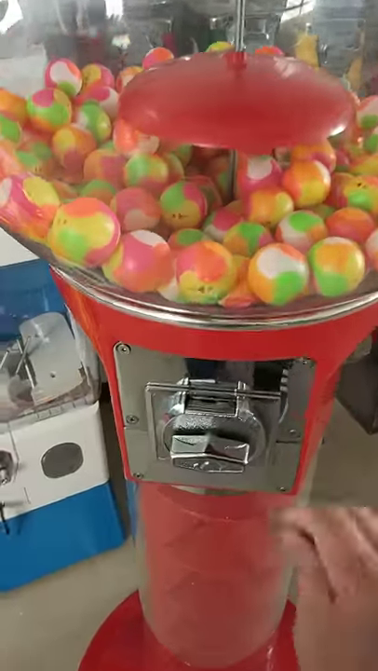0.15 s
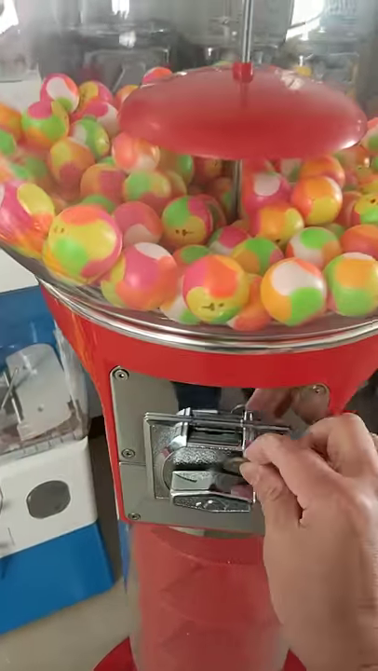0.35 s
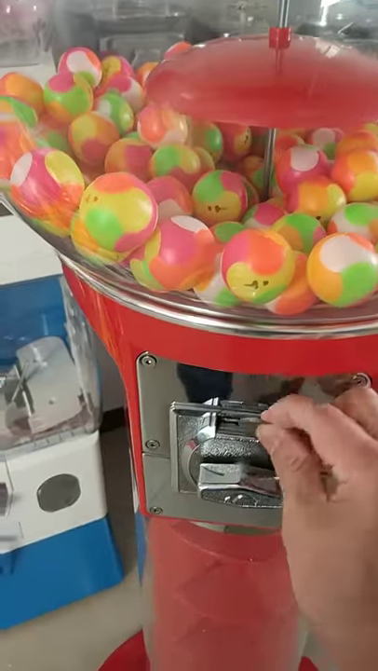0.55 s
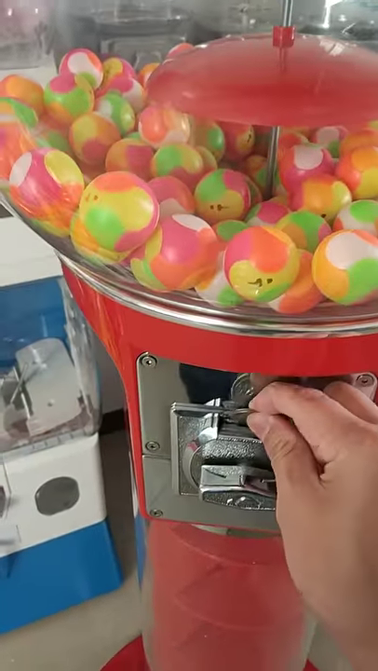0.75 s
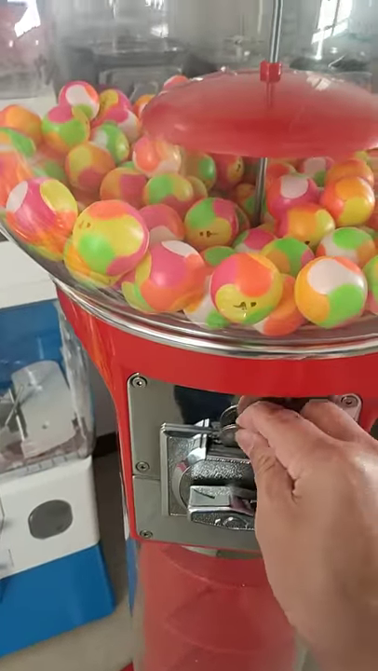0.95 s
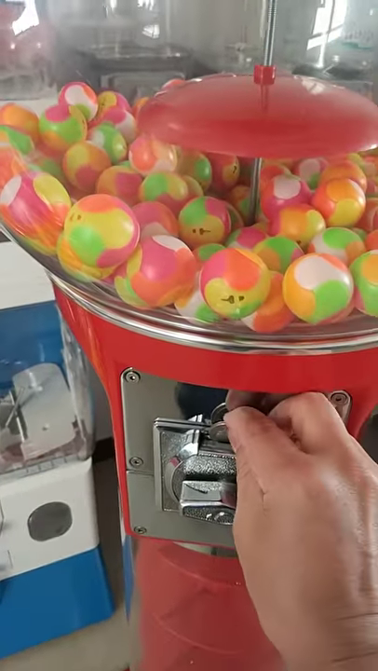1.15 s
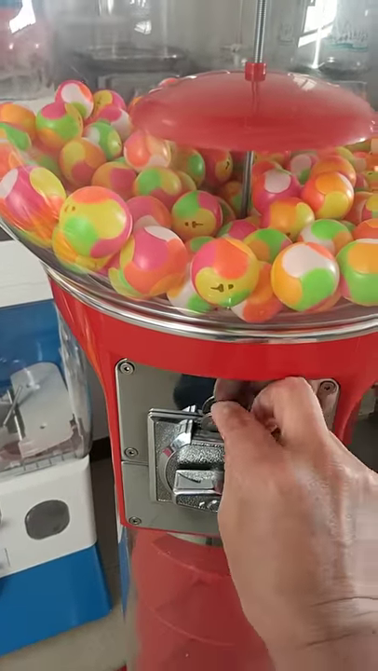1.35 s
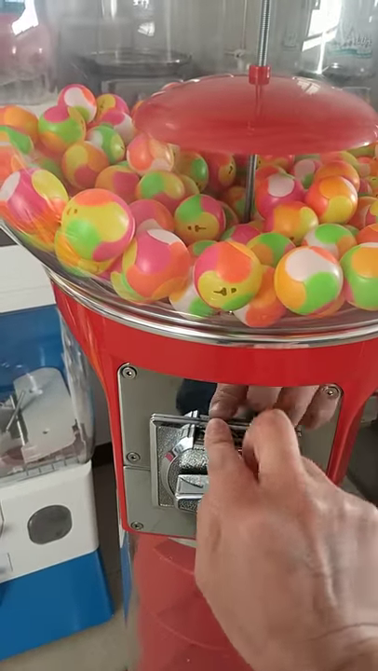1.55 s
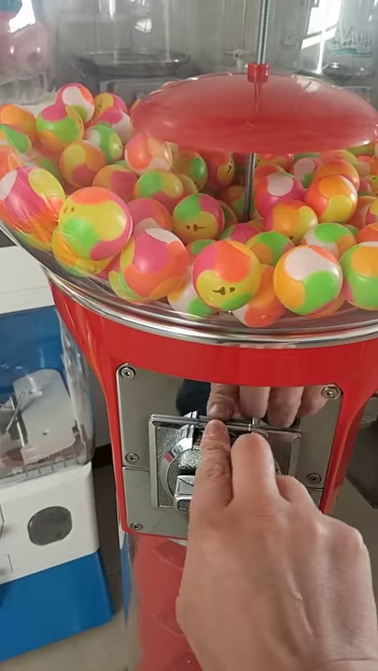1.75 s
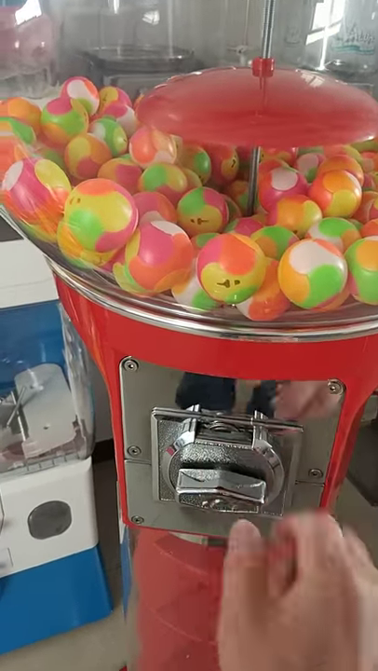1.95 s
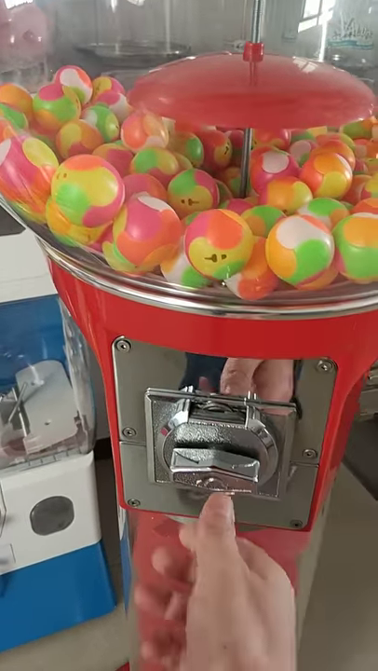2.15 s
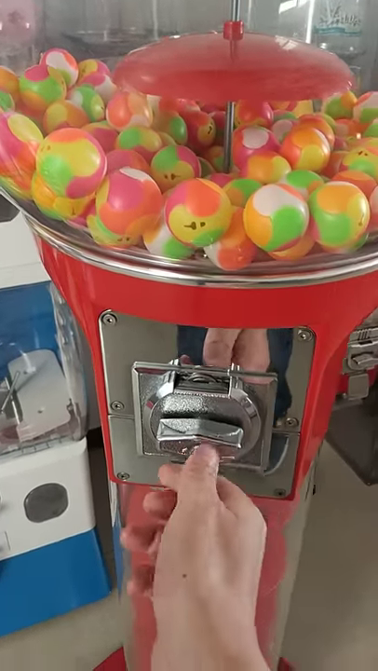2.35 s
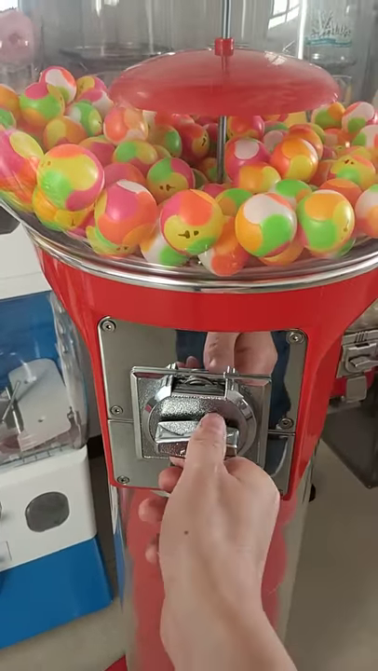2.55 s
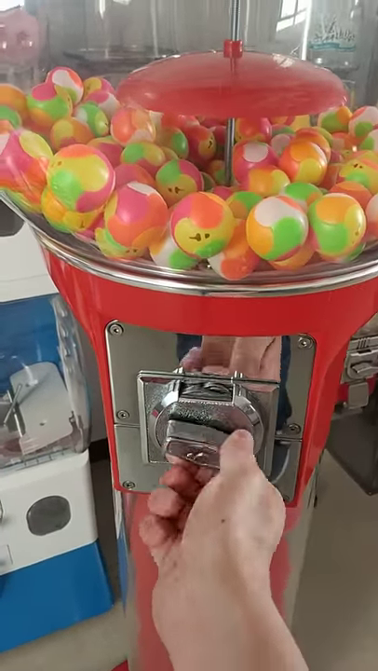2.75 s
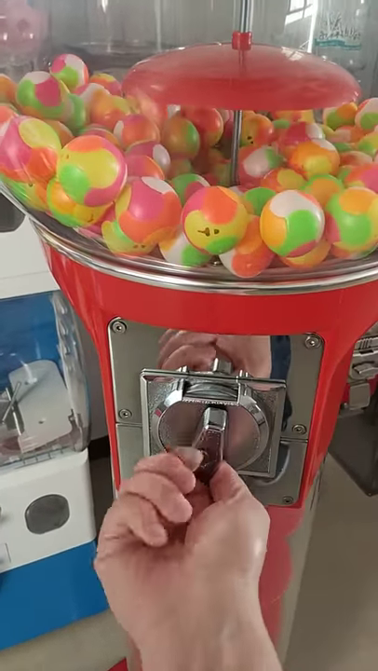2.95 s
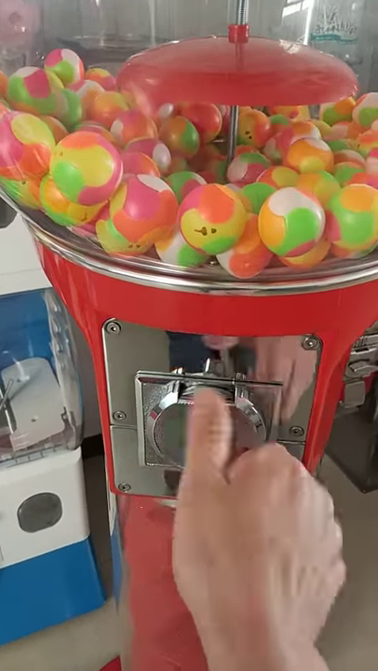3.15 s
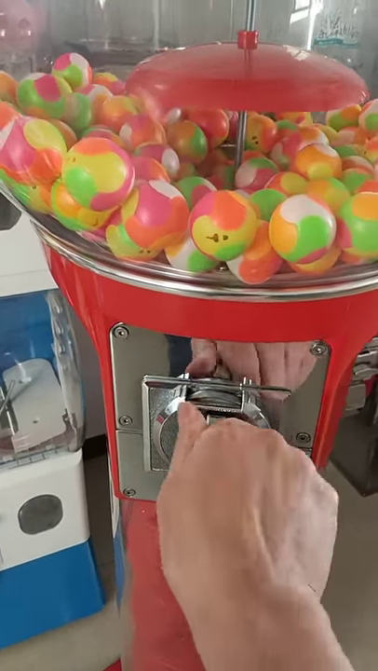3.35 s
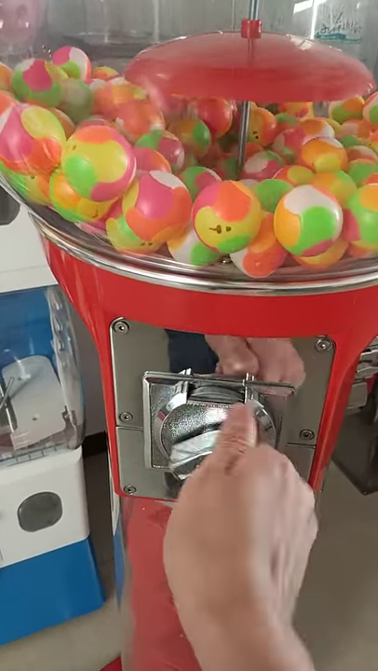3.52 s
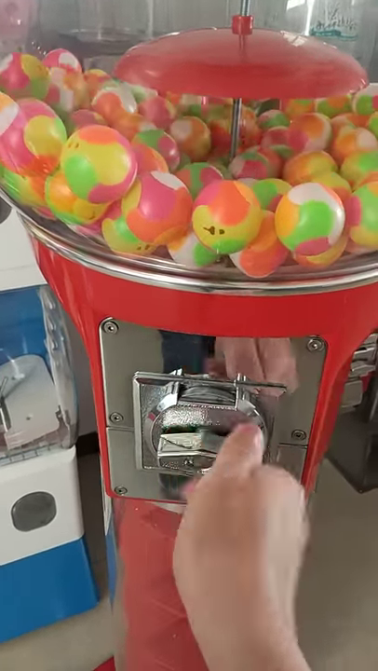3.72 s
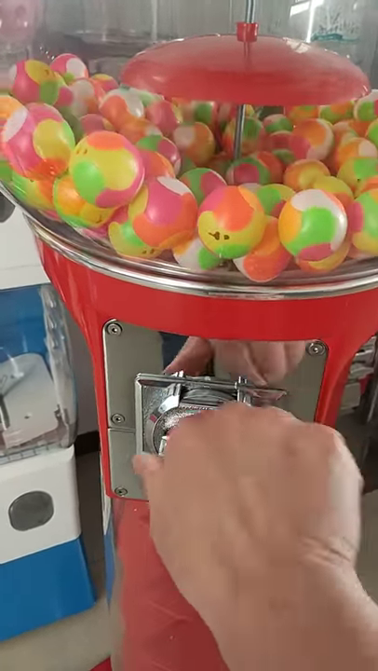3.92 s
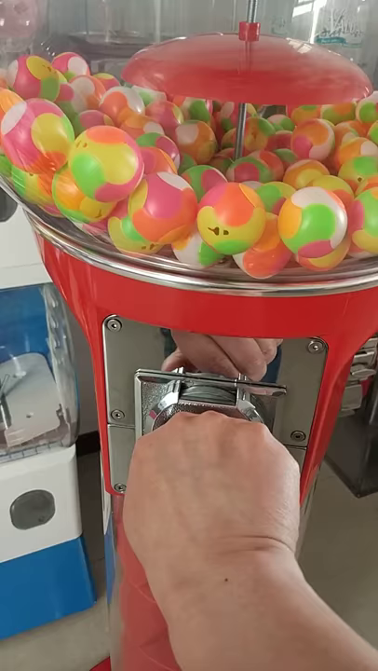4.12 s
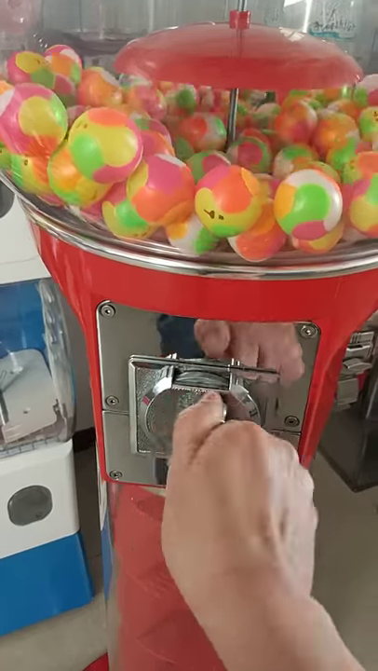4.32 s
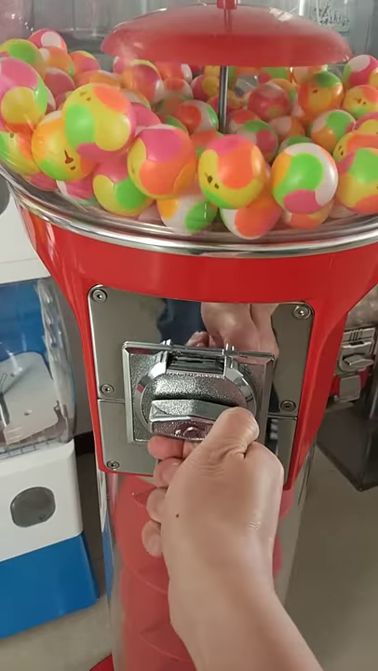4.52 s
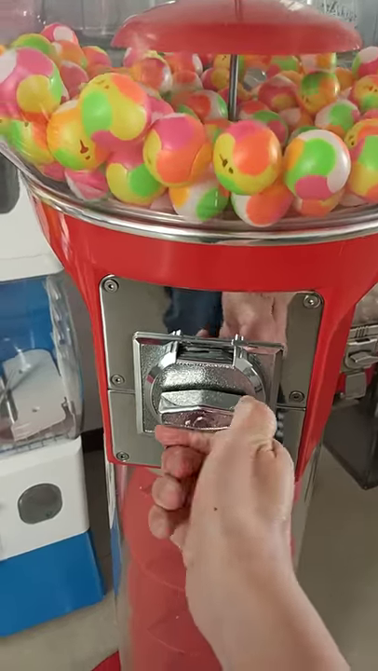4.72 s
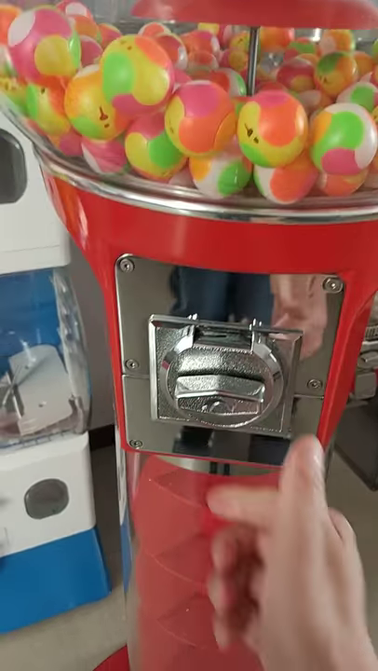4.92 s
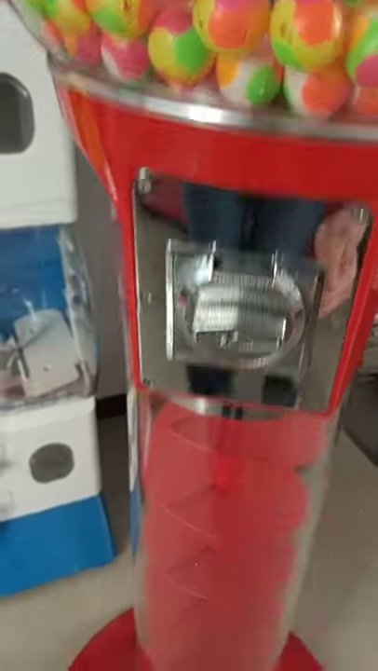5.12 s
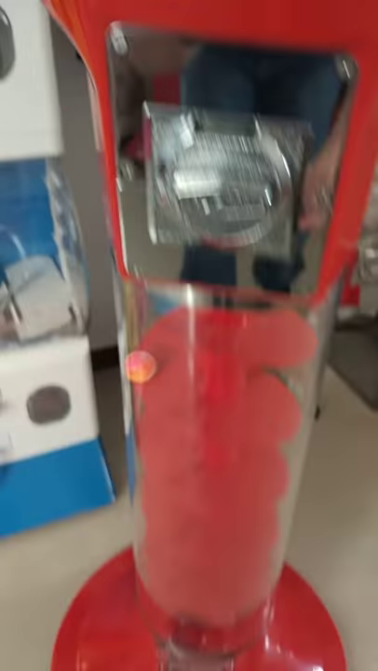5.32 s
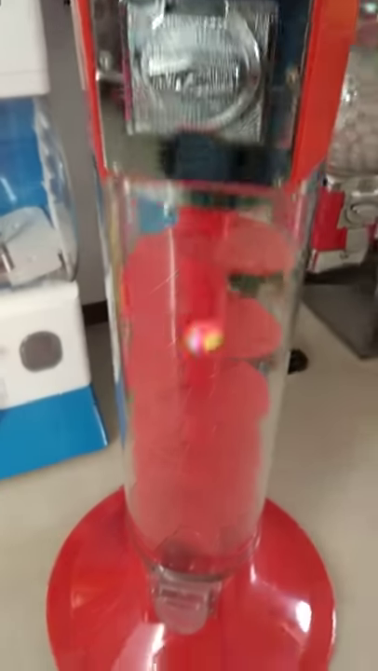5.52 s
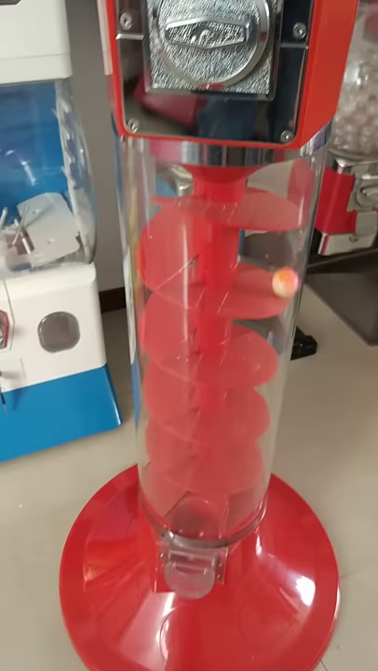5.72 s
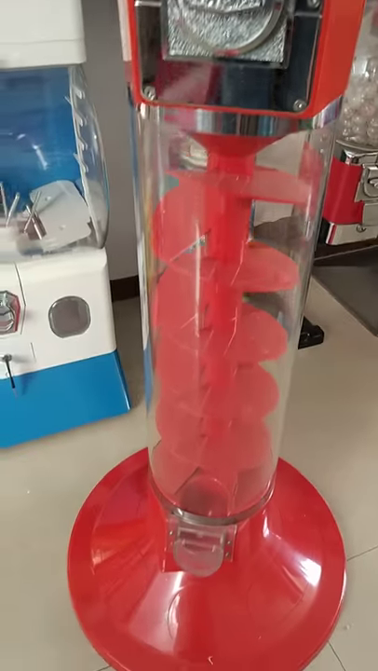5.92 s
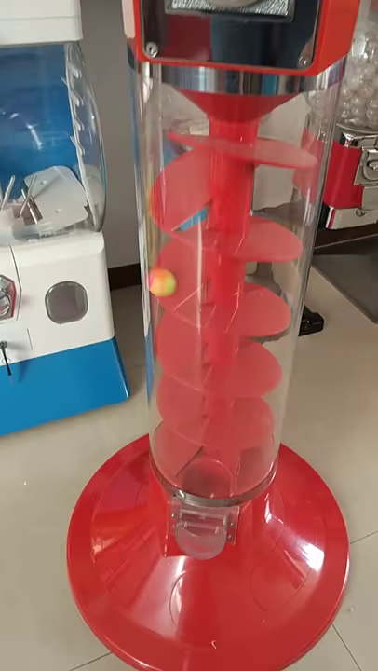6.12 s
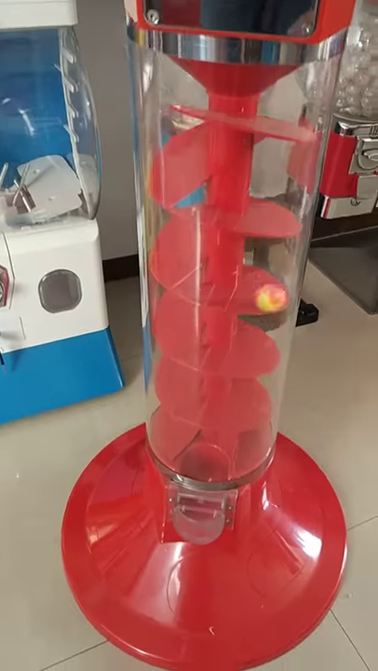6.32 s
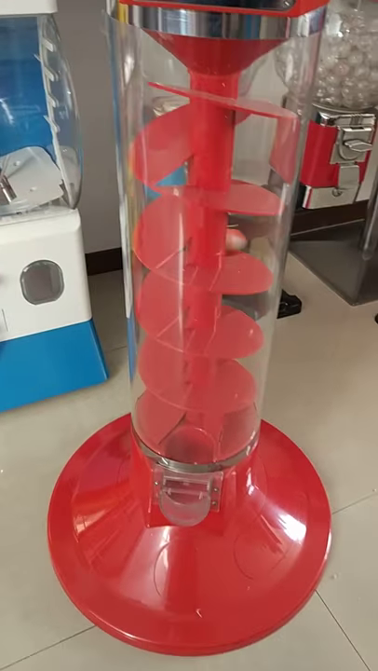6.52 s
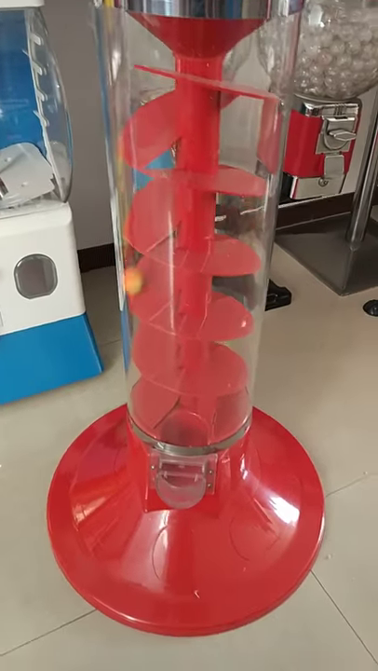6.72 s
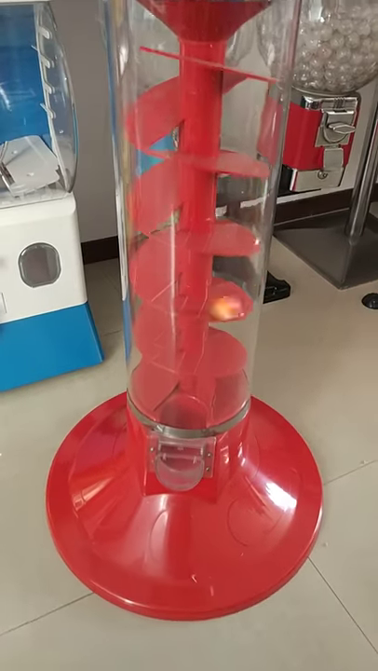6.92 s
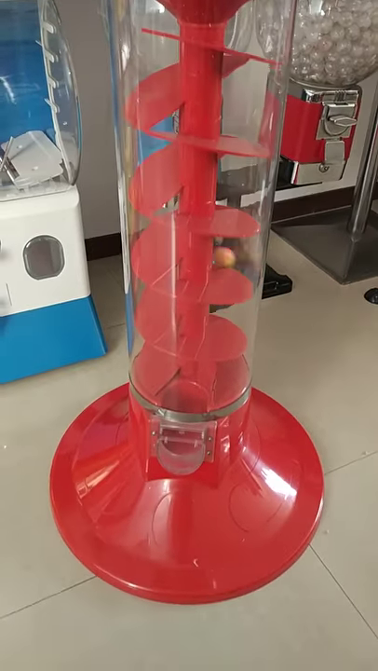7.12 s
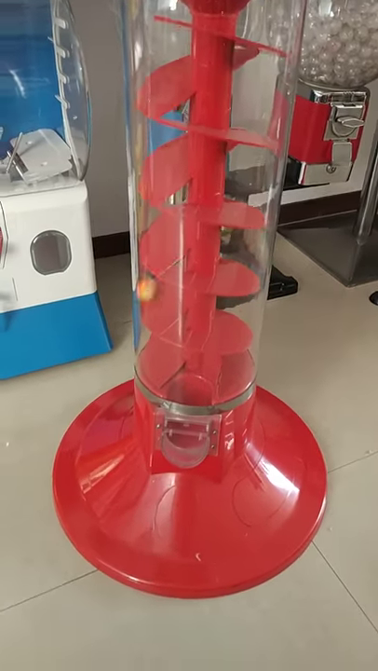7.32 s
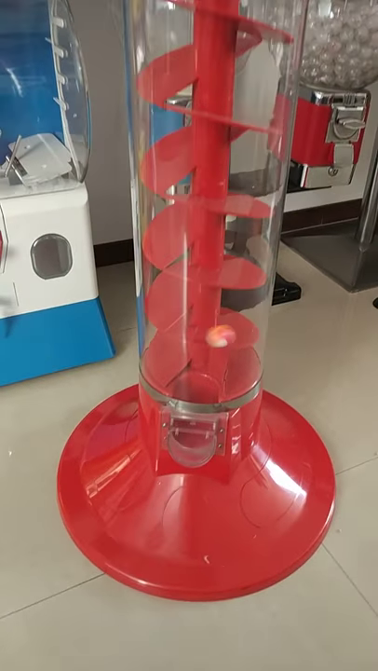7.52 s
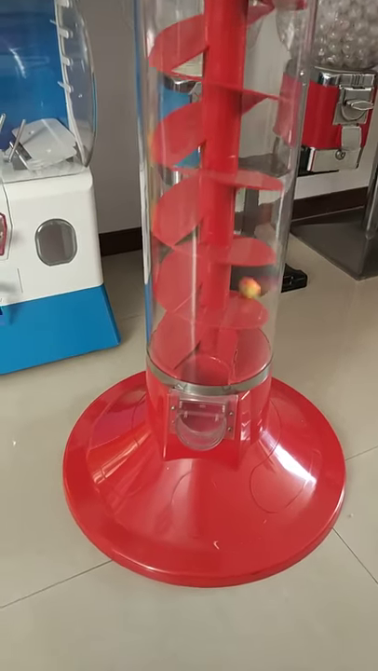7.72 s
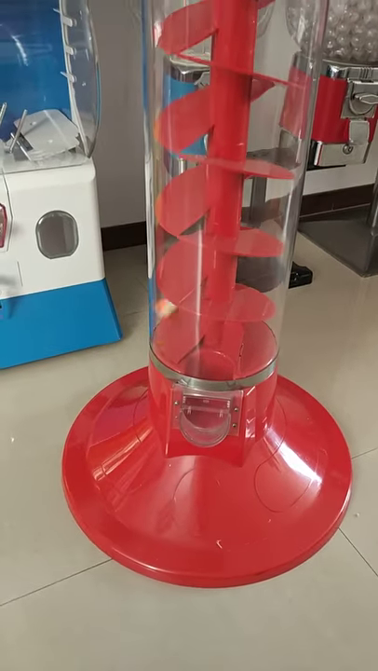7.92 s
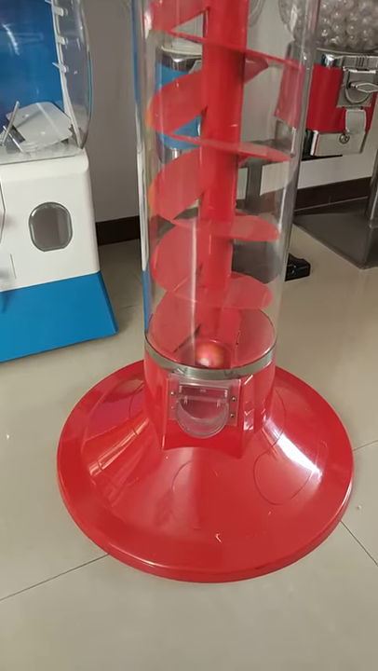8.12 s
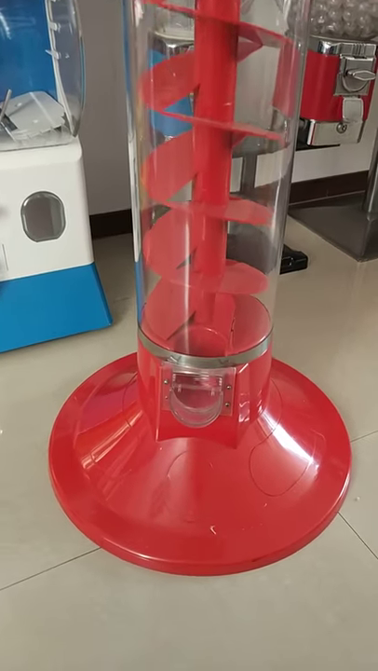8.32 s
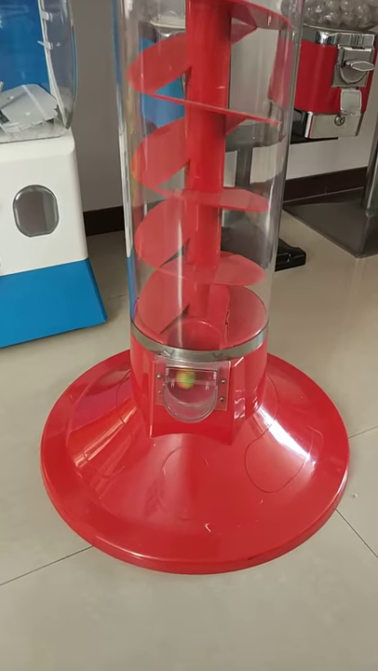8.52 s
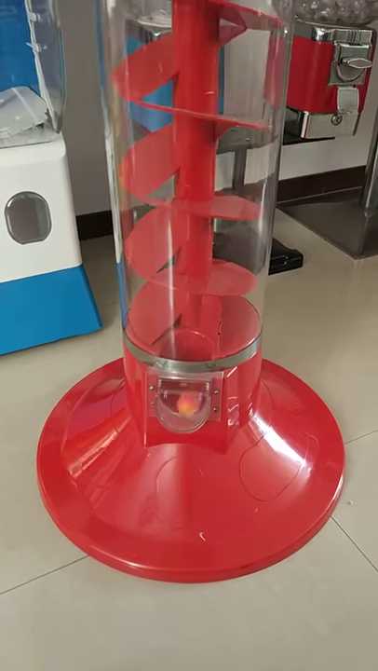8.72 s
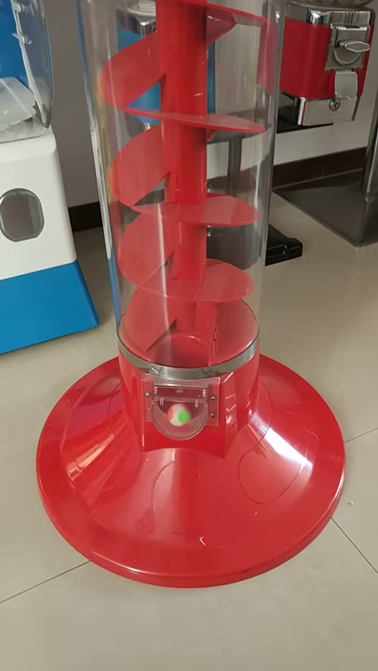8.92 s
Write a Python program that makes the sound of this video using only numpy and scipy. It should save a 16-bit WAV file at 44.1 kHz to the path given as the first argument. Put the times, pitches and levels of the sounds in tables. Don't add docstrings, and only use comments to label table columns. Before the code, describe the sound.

Close stereo phone pickup in a small hard room. A coin ticks and scrapes in a metal slot, then drops with a brief bright ring. A metal knob grinds round with sharp pawl clicks while rubber balls thud and clack inside. One ball drops with a hollow boom, rolls down a plastic spiral with faint rhythmic hisses and taps, then slaps the outlet flap twice.

```python
import sys
import numpy as np
from scipy import signal
from scipy.io import wavfile
from scipy.ndimage import uniform_filter1d, minimum_filter1d

SR = 44100
rng = np.random.default_rng(int(sys.argv[2]) if len(sys.argv) > 2 else 0)


def wav_out(sig):
    wavfile.write(sys.argv[1], SR, np.round(np.clip(np.atleast_2d(sig).T, -1, 1) * 32767).astype(np.int16))


def level_to_linear(level):
    exponent = np.asarray(level, float) / 20
    return 10 ** exponent


N = 395136

# frequency in Hz, level in dB per Hz.
AIR = [(24, -69), (130, -4), (209, 4), (444, 2), (556, -1.5), (896, 2), (1180, -8), (16000, -16)]
AIR_DB = -58
# time in seconds, level in dB.
AIR_SWELL = [
    [(0.0, -58), (0.044, -63), (0.32, -57)],
    [(8.81, -48), (8.846, -57), (8.96, -46)],
]
# frequency in Hz, t60 in seconds.
ROOM = [(200, 0.16), (530, 0.34), (1390, 0.29), (3680, 0.28), (9700, 0.29)]
# frequency in Hz, level in dB, t60 in seconds.
FAR_RING = [(2740, -63, 2.5)]
FAR_STOP_S = .12

# lower edge in Hz, upper edge in Hz.
BANDS_HZ = [(4000, 8000), (175, 1200), (1200, 4000), (8000, 15700)]
LIKENESS = [1, 0.41, 0.61, 0.85]
LAG = 8
ALIKE_RUB = [0.065, 0.58, 0.044, .05]
# frequency in Hz, left over right in dB.
PORTS = [(60, -3), (130, -9), (290, -0.5), (640, -1.5), (1410, -0.5), (3100, 3), (6820, -0.5),
         (15000, 13.5)]
# frequency in Hz, share from 0 to 1.
EMPTY = [(2300, .015), (4000, .27), (6000, .45), (10000, .12), (12500, .27), (14000, .55), (15500, .7),
         (15900, .99)]
MASK_DB, MASK_FROM_HZ, MASK_TO_HZ = -16, 2600, 8500

# frequency in Hz, width in Hz, level in dB over the broad response.
COIN_BODY = [(352, 150, 7.5), (562, 59, 7), (1056, 72, 6.5), (2570, 51, -24), (3250, 150, -44),
             (5240, 150, 14.5), (6200, 450, 3), (9500, 560, 10), (11000, 1100, 11), (11500, 29, 8),
             (14600, 110, -5)]
# frequency in Hz, width in Hz, level in dB.
KNOB_BODY = [(328, 73, 0.71), (450, 40, 9.5), (572, 57, 9), (792, 110, 0.5), (1590, 140, 3), (2100, 42, -3),
             (2800, 1400, 0.89), (3750, 120, 2.7), (6450, 4500, -0.5), (9500, 2300, 11.5),
             (10660, 1600, 11), (12300, 650, 8)]
# frequency in Hz, width in Hz, level in dB.
COLUMN_BODY = [(227.1, 7.4, 27.1), (378, 6.9, 4.7), (592, 17, 16.3), (780, 180, 3.2), (1185, 470, 9.8),
               (2450, 640, 11), (3256, 1020, 12.3), (9330, 2300, 13.6)]
HARD_BODY = COLUMN_BODY[2:]
# frequency in Hz, width in Hz, level in dB.
SLOT = [(3120, 570, 17), (3870, 970, 27), (6150, 460, 27)]
# frequency in Hz, width in Hz, level in dB.
FLAP_BODY = [(830, 80, 17.5), (1220, 150, 15.5), (2260, 500, 13), (3470, 300, 1), (4250, 84, -25),
             (8800, 2500, 9), (12500, 1500, 15)]

# treble, bass and middle over the force in dB; how each follows hardness
# in dB per dB; chatter t60 in seconds. TICK and NUDGE are the coin's.
TICK = (0, -16.5, -14.5), (0, -1.19, -0.78), 0.017
NUDGE = (-9, -10.5, 0), (0.82, -0.09, 0), 0.18
PUSH = (-16.5, 0, -15), (0.46, 0, 0.45), 0.047
CLICK = (0, -14, -10), (0, -0.061, -0.44), 0.015
CLUNK = (-0.8, -15.5, 0), (0, -0.9, 0), 0.024
THUD = (0, 0, -7), (0.69, 0, 0.3), 0.061
CLACK = (0, -45, 0), (0.82, .1, 0), 0.037
HOLLOW = (-3.5, -3.5, -5), (0.36, 0, 0.59), 0.05
RAP = (-0.27, -10, 0), (1, 0.79, 0), 0.04
SEAM = (0, -6.5, -4), (0, -1.3, -0.41), 0.063
SLAP = (0, -26, -10.5), (0, -2.06, -0.29), 0.048
# treble, bass, middle and fizz over the pressure in dB;
# how each follows speed in dB per dB.
CRANK_COLOUR = (0.84, -3.5, 0, 1), (0.36, -0.27, 0.063, 0.75)
SLIDE_COLOUR = (-1.8, -16, 0, -4.5), (1, 2, 0.014, 1.68)
ROLL_COLOUR = (-3.5, -5.5, 0, -7), (0.7, 0.05, 0.092, 1)
KNOCK_MOST_DB = 6
RING_MOST_DB, RING_MOST_S = 3, .06

# start in seconds, force in dB, hardness in dB, pitch in Hz.
COIN_TICKS = [(0.3333, -19, 3.5, 8900), (0.3704, -17, 8, 8800), (0.3761, -16, 1, 3600),
              (0.403, -11.5, -11, 545), (0.4075, -17, -14, 1430), (0.4597, -29, 8, 4320),
              (0.4742, -32, 8, 3340), (0.4861, -20.5, 16, 4570), (0.5111, -18.5, 19, 4140),
              (0.5065, -27, 18, 3800), (0.549, -22, 15, 6370), (0.543, -39, 10, 6200),
              (0.553, -38, 8, 3980), (0.118, -46, -11, 1900), (0.5216, -12.5, 33, 6200),
              (0.816, -15.5, 7.5, 6340), (0.9583, -37.5, -16.5, 2100), (1.0452, -62, -25, 8000),
              (1.5351, -35, -12, 6900), (1.5885, -12.5, -2, 5600), (1.5897, -15, -6.5, 12050),
              (1.594, -22, 4, 9000), (1.8592, -34.5, -10, 4200), (1.889, -37, -4, 3470)]
# start in seconds, force in dB, hardness in dB, pitch in Hz.
COIN_NUDGES = [
    (0.4267, -31, 20, 3600),
    (0.634, -42.5, -16, 2640),
    (0.7361, -40, 14.5, 2400),
    (0.832, -35, 7, 2570),
]
# time in seconds, pressure in dB, speed as brightness in dB.
SLIDE = [
    [(0.44, -47, -6), (0.475, -39, -8), (0.5, -37, -6), (0.52, -35, -2)],
    [(0.515, -33, 2), (0.535, -32, 1), (0.558, -31, 1), (0.57, -42, -3), (0.6, -56, -8)],
    [(1.563, -40, -40), (1.585, -40, 10.5), (1.592, -39, 15)],
]
CATCHES_PER_S, CATCH_SHARE = 600, .55
# frequency in Hz, level in dB, t60 in seconds.
COIN_RING = [(5430, -35, 0.24), (15000, -44, 0.17), (6500, -55, 0.13), (9000, -35, 0.21),
             (10030, -34, 0.19), (11440, -42, 0.4), (12050, -42, 0.1)]
COIN_DROP_S = 1.59
# time in seconds, level in dB.
SING = [(3.64, -62), (3.74, -55), (3.85, -47), (3.99, -71), (4.04, -64), (4.14, -48), (4.28, -76)]
SING_HZ, SING_WIDTH = 15020, 70
SLIDE_DB, COIN_DRY = 1.5, .45
TICK_RING_S = .009

# start in seconds, force in dB, hardness in dB.
THUMB = [(2.3482, -37.5, 8), (2.4057, -40.5, -10), (2.5507, -37, 11.5), (2.7285, -31.5, -44),
         (2.808, -35, 13), (2.841, -37, 7), (3.3661, -26, 12.5), (3.4917, -36.5, 6), (3.5366, -36, -9),
         (3.5558, -28, 16), (3.967, -36.5, 47)]
# start in seconds, force in dB, hardness in dB, pitch in Hz.
PAWL = [
    (2.9581, -8.5, -3, 9590),
    (2.9922, -6.5, -9, 4000),
    (3.626, -5, -3, 9500),
    (3.6378, -11.5, -7, 7750),
    (4.3101, -10, -11, 9600),
    (4.3251, -10, -7, 11000),
    (4.5592, -7, -8, 9330),
]
# start in seconds, force in dB, hardness in dB, pitch in Hz.
WHEEL = [
    (3.7841, -14.5, -20, 2700),
    (4.0448, -20.5, 19, 2800),
    (4.0495, -19.5, 13, 2800),
    (4.132, -17, -4, 2570),
    (4.1365, -12.5, -1, 2800),
]
# time in seconds, pressure in dB, speed as brightness in dB.
CRANK = [
    [(2.76, -66, -21), (2.81, -51, -8), (2.846, -54, -8), (2.88, -45.5, -11), (2.912, -40.5, -18),
     (2.95, -42, -6), (2.982, -56, 2), (3.052, -35.5, -0.5), (3.152, -48.5, 6), (3.22, -54.5, -2)],
    [(3.52, -60, -3), (3.61, -35.5, -15), (3.726, -36.5, 2), (3.772, -37.5, -9), (3.795, -31.5, -1),
     (3.84, -35.5, 6.5), (3.888, -41, -10), (3.988, -53, -16), (4.04, -47, -23)],
    [(4.045, -31.5, -17), (4.146, -46.5, -9), (4.282, -43, -13), (4.4, -34, 1.5), (4.502, -40.5, -4),
     (4.556, -40, -17), (4.664, -40, 14), (4.802, -47, -21), (4.92, -71, 4)],
]
KNOB_HZ, HEAP_HZ, WALL_HZ = 1990, 483, 1214

# start in seconds, force in dB, hardness in dB.
HEAP_THUDS = [(2.879, -26, -14), (2.86, -29, -3), (2.905, -26, -5), (2.9292, -22, 3), (3.081, -27, 17),
              (3.5677, -23, -6), (3.7729, -23.5, 9), (4.2515, -23, -9), (4.281, -23, 4), (4.289, -19.5, -1),
              (4.297, -33, -12), (4.505, -30, -13), (4.4491, -21.5, -14)]
# start in seconds, force in dB, hardness in dB, pitch in Hz.
HEAP_CLACKS = [
    (3.802, -10, 4, 2850),
    (3.8221, -11, -3, 2790),
    (3.8374, -11.5, -1, 3100),
    (3.8809, -19.5, -6, 2100),
    (3.9077, -20, -19, 2800),
    (3.929, -21, -20, 2620),
    (4.0569, -15.5, -12, 2430),
]
# start in seconds, then modes of frequency in Hz,
# level in dB, t60 in seconds.
SLUMPS = [
    (3.784, [(587, -25, 0.11), (447, -30, 0.071), (330, -32, 0.11)]),
    (4.448, [(452, -27.5, 0.23), (564, -25, .12), (770, -33, .1)]),
    (2.928, [(355, -28, 0.086), (450, -30, 0.088)]),
    (3.078, [(345, -28, .1), (450, -28, 0.12)]),
    (4.505, [(300, -27, .06)]),
    (4.761, [(330, -29, 0.054)]),
]
HEAP_RING_DB = -10

# time in seconds, pressure in dB.
ROLL = [(4.95, -54), (4.99, -58.5), (5.45, -58), (5.53, -56), (5.73, -53.5), (6.3, -51.5), (7.4, -50.5),
        (7.84, -51.5), (7.88, -47), (7.95, -52.5), (8.17, -47)]
ROLL_GRIT = .3
# start in seconds, end in seconds, brightness in dB.
LAPS = [
    (5.09, 5.266, 12.5),
    (5.81, 6.0, 8),
    (6.304, 6.46, 3.5),
    (6.756, 6.887, 11),
    (7.293, 7.39, 9.5),
    (7.567, 7.765, 8),
    (7.862, 7.97, 10),
    (8.03, 8.1, 5.5),
]
COME_S, GO_S = 0.023, 0.077
SWISH_DB, SWISH_LEAN, SWISH_FADE_DB_PER_S = -4, 1.2, -6
# start in seconds, force in dB, hardness in dB.
WALL_KNOCKS = [(4.655, -22.5, 7), (4.675, -37, 1), (4.696, -29.5, 13), (5.229, -30.5, -27),
               (5.4353, -43, -12), (5.5531, -45, 5), (5.8389, -47, -6), (7.0287, -44, -8),
               (7.7286, -39, -2), (4.7614, -41, -15), (5.5123, -40, 10), (5.925, -31.5, -15),
               (5.9608, -34, 1), (6.2831, -32, -8), (6.6007, -38.5, 1), (6.925, -42, 4), (7.09, -39, 8),
               (7.135, -37, -10), (7.225, -37.5, -7), (7.5285, -36.5, 6), (7.912, -35, 3), (7.985, -38, -2),
               (8.1022, -36, 7)]
# start in seconds, force in dB, hardness in dB, pitch in Hz.
RAMP_KNOCKS = [(4.81, -33.5, 3.5, 2630), (4.9702, -37.5, 3.5, 3760), (5.2356, -34, -0.5, 3040),
               (5.246, -36.5, 3, 2450), (5.285, -43, -10, 2820), (5.5782, -34, -15, 2840),
               (5.6147, -38, -24, 3170), (6.0408, -38, -18, 3540), (6.319, -37, 2, 3200),
               (5.6489, -45, -25, 3460), (5.8718, -39, -7, 3180), (6.0115, -37.5, -8, 3100),
               (6.1462, -38, -0.5, 2730), (6.2804, -36, -5, 3630), (6.297, -35.5, 4, 2920),
               (6.5473, -43, 2, 3400), (6.6616, -54, -13, 3200), (7.0038, -41.5, -1.5, 3680),
               (7.4338, -47, -6, 3370), (7.865, -42, -4, 2600), (7.897, -32.5, -3, 2860),
               (7.915, -39, -10, 3500), (8.214, -36, 3, 2100), (8.246, -40.5, 8, 2400),
               (8.322, -31, 5, 2400), (8.334, -34.5, 10.5, 1960), (7.166, -33, -11, 3180),
               (7.8608, -45, 6, 2400), (7.9664, -33.5, -1, 3600), (8.476, -40.5, 0.5, 2100),
               (8.5062, -42.5, -1, 3350), (8.6498, -40.5, -3, 4630), (8.7947, -48, 5.5, 5600),
               (8.8024, -37, 2.5, 2430)]
# start in seconds, force in dB, hardness in dB, pitch in Hz.
SEAM_TICKS = [
    (6.4018, -36, 12, 10540),
    (7.3003, -36.5, 11, 3410),
    (7.588, -32, 4.7, 3600),
    (7.6568, -39, 19, 8900),
    (7.797, -35.5, 33, 9500),
    (8.0297, -33, 3.1, 9500),
]
# start in seconds, force in dB, hardness in dB, pitch in Hz.
LANDINGS = [
    (4.6475, -14, 4, 9820),
    (8.1714, -26.5, -6, 9750),
    (8.2046, -16, -5, 3490),
    (8.3016, -16, -5.5, 4250),
]
# frequency in Hz, level in dB, t60 in seconds.
BOOM = [(222, -36, .75), (227, -42, .7), (357, -35, .6)]
DROP_S = 4.652
# start in seconds, then modes of frequency in Hz, level in dB,
# t60 in seconds.
FLAP_NOTES = [
    (8.2046, [(3400, -25, .03), (7780, -27, 0.066), (12500, -23, .05)]),
    (8.3015, [(4090, -15, 0.028), (1060, -27.5, 0.075), (8420, -26, .04), (12500, -28, .05)]),
]
# start in seconds, level in dB.
HOLLOW_BEATS = [(6.6001, -44), (6.848, -45), (6.9222, -43), (7.0291, -42), (7.1364, -42), (7.2243, -45),
                (7.3, -47), (7.4696, -50), (7.5343, -36), (7.7275, -37), (7.9113, -34), (7.987, -37),
                (8.0314, -42), (8.123, -45)]
HOLLOW_NOTE_HZ, HOLLOW_T60 = 1200, .06
RAMP_RING_S, SOFT_RISE_S = .02, .002


def evened(x):
    return x / np.sqrt(np.mean(x ** 2) + 1e-20)


def read(points, hz):
    f, value = np.transpose(points)
    return np.interp(np.log(hz + 1), np.log(f + 1), value)


def curve(rows):
    s, *levels = np.transpose(rows)
    t = np.arange(N) / SR
    edge = np.clip(np.minimum(t - s[0], s[-1] - t) / .008, 0, 1)
    return np.array([level_to_linear(np.interp(t, s, db)) * edge for db in levels])


def filtered_noise(order, hz, kind):
    sos = signal.butter(order, hz, kind, fs=SR, output="sos")
    return signal.sosfilt(sos, rng.standard_normal((2, N)))


def air():
    frames, hz = N // 256 + 5, np.fft.rfftfreq(1024, 1 / SR)
    a, b, c, d, patches = rng.standard_normal((frames, 513, 5)).T
    patches = evened(uniform_filter1d(uniform_filter1d(patches, 12, 0), 20, 1))
    same = 0.37 * np.exp(-(hz[:, None] / 1000) ** 4)
    left = a + 1j * b
    right = same * left + np.sqrt(1 - same ** 2) * (c + 1j * d)
    z = np.array([left, right]) * level_to_linear(read(AIR, hz)[:, None] + 2.33 * patches)
    tone = signal.istft(z, nperseg=1024, noverlap=768)[1][:, :N]
    cloth = sum(curve(rows) for rows in AIR_SWELL) * filtered_noise(2, [1500, 14000], "bandpass")
    return level_to_linear(AIR_DB + 5.5) * evened(tone) + level_to_linear(7.5) * cloth


def room(x):
    taps = np.zeros((2, SR // 2))
    at = np.arange(200, SR // 2 - 20, 20) + rng.integers(0, 20, (2, (SR // 2 - 201) // 20))
    np.put_along_axis(taps, at, rng.choice([-1., 1.], at.shape), 1)
    hz, t, z = signal.stft(taps, SR, nperseg=256)
    tail = signal.istft(z * level_to_linear(-60 * t / read(ROOM, hz)[:, None]), SR, nperseg=256)[1]
    tail = tail * np.minimum(np.arange(tail.shape[1]) / SR / 0.012, 1) ** 0.62
    return signal.oaconvolve(x, tail / np.linalg.norm(tail[0]), axes=1)[:, :N]


def ring(start, modes, rise=0.0014):
    t = np.maximum(np.arange(N) / SR - start, 0)
    notes = sum(level_to_linear(db - 60 * t / t60) * np.sin(2 * np.pi * hz * t) for hz, db, t60 in modes)
    return notes * np.minimum(t / rise, 1)


def far_metal():
    return ring(0, FAR_RING, .01) * (np.arange(N) < FAR_STOP_S * SR)


def pair(shape, alike, lag):
    a, b = rng.standard_normal((2, 4) + shape)
    same = np.clip(alike, 0, 1)[:, None]
    late = np.roll(a, round(lag), axis=1)
    return np.stack([a, same * late + np.sqrt(1 - same ** 2) * b], axis=1)


def body(force, modes):
    t = np.arange(8192) / SR
    response = np.zeros(len(t))
    for hz, width, db in modes:
        decay = np.exp(-np.pi * width * t)
        response += level_to_linear(db) * 2 * np.pi * width / SR * decay * np.cos(2 * np.pi * hz * t)
    response[0] += 1
    heard = 0
    for band_force, edge in zip(force, BANDS_HZ):
        band = signal.sosfilt(signal.butter(4, edge, "bandpass", fs=SR, output="sos"), response)
        heard = heard + signal.oaconvolve(band_force, (band / np.linalg.norm(band))[None], axes=1)[:, :N]
    return heard


def struck(rows, kind, hz=None):
    colour_db, lean, t60 = kind
    return [(s, *(force_db + np.array(colour_db) + hard_db * np.array(lean)), t60, *(own or [hz]))
            for s, force_db, hard_db, *own in rows]


def blows(rows, modes, slow, cut_db, fizz_db, ring_db, ring_t60, rise):
    force, part = np.zeros((4, 2, N + 5000)), np.zeros((2, N + 5000))
    t = np.arange(5000) / SR
    onset = np.minimum(t / rise, 1)
    part_fall_db = min(ring_db, RING_MOST_DB) - 60 * t / min(ring_t60, RING_MOST_S)
    for s, treble_db, bass_db, middle_db, t60, hz in rows:
        lasts = max(t60, .003) * np.array([1, slow, 1.3, .9])[:, None]
        high_db = treble_db + cut_db
        level_db = np.array([high_db, bass_db, middle_db, high_db + fizz_db])[:, None]
        fall = level_to_linear(level_db - 60 * t / lasts) * onset
        at = round(s * SR)
        chatter = pair(t.shape, LIKENESS, LAG * rng.uniform(-1.2, 1))
        force[:, :, at:at + 5000] += chatter * fall[:, None]
        own_db = np.interp(hz, [1100, 1300, 4000, 4400], [bass_db, middle_db, middle_db, treble_db])
        cycles = hz * rng.uniform(.984, 1.016, (5, 1, 1)) * t + rng.random((5, 2, 1))
        close = np.sin(2 * np.pi * cycles).sum(0)
        part[:, at:at + 5000] += level_to_linear(own_db + part_fall_db) * close * onset
    return level_to_linear(1.5) * (body(force[:, :, :N], modes) + part[:, :N])


def pressed(rows, colour):
    return [(s, *(press_db + np.array(colour[0]) + fast_db * np.array(colour[1])))
            for s, press_db, fast_db in rows]


def rubbing(tables, level_db, per_s, spread_db, grit, lumpy_db):
    knocks = level_to_linear(min(spread_db, KNOCK_MOST_DB) * np.minimum(rng.exponential(1, N), 3))
    knocks = knocks * (rng.random(N) < per_s / SR)
    knocks = evened(signal.lfilter([1], [1, -np.exp(-1 / (0.0086 * SR))], knocks))
    share = np.clip(grit, 0, .9) * np.array([.5, 1, 1, .25])[:, None]
    lumps = evened(uniform_filter1d(rng.standard_normal((4, N // 64 + 1)), size=24, axis=1))
    lumps = lumps.repeat(64, axis=1)[:, :N] * np.array([0.36, 1, 0.74, 0.62])[:, None]
    strokes = sum(curve(rows) for rows in tables)
    level = strokes * (1 - share + share * knocks) * level_to_linear(level_db + lumpy_db * lumps)
    return level[:, None] * pair((N,), ALIKE_RUB, lag=1)


def coin_blows():
    return blows(struck(COIN_TICKS, TICK) + struck(COIN_NUDGES, NUDGE), COIN_BODY,
                 slow=2.9, cut_db=-7.0, fizz_db=-3.5, ring_db=-4.5, ring_t60=TICK_RING_S, rise=0.00013)


def coin_slide():
    friction = rubbing([pressed(rows, SLIDE_COLOUR) for rows in SLIDE], SLIDE_DB,
                       per_s=CATCHES_PER_S, spread_db=1.5, grit=CATCH_SHARE, lumpy_db=-2.5)
    return body(friction, SLOT + COIN_BODY[7:])


def singing_coin():
    r = np.exp(-np.pi * SING_WIDTH / SR)
    noise = rng.standard_normal((2, N)) + 1j * rng.standard_normal((2, N))
    slow = signal.lfilter([1], np.convolve([1, -r], [1, -r]), noise)
    tone = (slow * np.exp(2j * np.pi * SING_HZ * np.arange(N) / SR)).real
    return level_to_linear(4.0) * curve(SING) * evened(tone)


def knob_blows():
    rows = struck(THUMB, PUSH, KNOB_HZ) + struck(PAWL, CLICK) + struck(WHEEL, CLUNK)
    return blows(rows, KNOB_BODY,
                 slow=2.13, cut_db=-2.5, fizz_db=0.0, ring_db=-7.5, ring_t60=0.017, rise=0.0002)


def knob_crank():
    friction = rubbing([pressed(rows, CRANK_COLOUR) for rows in CRANK], 3.7,
                       per_s=334, spread_db=6.0, grit=0.45, lumpy_db=3.0)
    return body(friction, KNOB_BODY)


def heap_blows():
    return blows(struck(HEAP_THUDS, THUD, HEAP_HZ) + struck(HEAP_CLACKS, CLACK), KNOB_BODY,
                 slow=1.45, cut_db=-6.5, fizz_db=-4.5, ring_db=HEAP_RING_DB, ring_t60=0.047, rise=0.0028)


def laps():
    t = np.linspace(ROLL[0][0], ROLL[-1][0], num=400)
    passes = [db * np.clip(np.minimum(1 + (t - s) / COME_S, 1 - (t - end) / GO_S), 0, 1)
              for s, end, db in LAPS]
    return zip(t, np.interp(t, *np.transpose(ROLL)), np.max(passes, axis=0))


def swish():
    rows = []
    for s, db, near_db in laps():
        fade_db = SWISH_FADE_DB_PER_S * (s - ROLL[0][0])
        rows.append((s, db + SWISH_DB + SWISH_LEAN * near_db + fade_db))
    return curve(rows) * filtered_noise(3, 11000, "highpass")


def ball_roll():
    friction = rubbing([pressed(laps(), ROLL_COLOUR)], 3.0,
                       per_s=160, spread_db=9.0, grit=ROLL_GRIT, lumpy_db=3.0)
    return body(friction, COLUMN_BODY)


def ball_blows():
    ramp = blows(struck(RAMP_KNOCKS, RAP) + struck(SEAM_TICKS, SEAM), HARD_BODY,
                 slow=1.7, cut_db=-3.0, fizz_db=-0.5, ring_db=1.5, ring_t60=RAMP_RING_S, rise=SOFT_RISE_S)
    wall = blows(struck(WALL_KNOCKS, HOLLOW, WALL_HZ), HARD_BODY,
                 slow=0.77, cut_db=-3.0, fizz_db=2.5, ring_db=2.0, ring_t60=0.033, rise=SOFT_RISE_S)
    flap = blows(struck(LANDINGS, SLAP), FLAP_BODY,
                 slow=1.45, cut_db=-9.0, fizz_db=4.0, ring_db=-5.5, ring_t60=0.02, rise=0.00058)
    return ramp + wall + flap


def free_rings():
    coin = ring(COIN_DROP_S, COIN_RING)
    flap = sum(ring(s, notes) for s, notes in FLAP_NOTES)
    housing = sum(ring(s, notes, .004) for s, notes in SLUMPS)
    wall_ring = sum(ring(s, [(HOLLOW_NOTE_HZ, db - 2.0, HOLLOW_T60)], .003) for s, db in HOLLOW_BEATS)
    return coin + flap + housing + wall_ring


def scene():
    ball_side = level_to_linear([[1.5], [-1.5]])
    coin = coin_blows()
    hits = coin + knob_blows() + heap_blows() + ball_blows() * ball_side + free_rings()
    rubs = coin_slide() + knob_crank() + singing_coin() + ball_roll() * ball_side
    echoes = level_to_linear(-2.5) * room(hits - COIN_DRY * coin) + level_to_linear(-5.0) * room(rubs)
    boom = ring(DROP_S, BOOM, 0.011)
    return air() + far_metal() + echoes + hits + boom + rubs + swish()


def dropouts(x):
    hz, t, z = signal.stft(x, SR, nperseg=1024, noverlap=768)
    power = (abs(z) ** 2).mean(0) + 1e-16
    near = uniform_filter1d(uniform_filter1d(power, size=5, axis=0), size=5, axis=1) + 1e-16
    around = uniform_filter1d(near, size=40, axis=0)
    weak = np.clip(.9 * np.log(abs(around / near) + 1e-9), -2.5, 2.5)
    luck = rng.standard_normal((len(t), len(hz))).T
    field = weak + evened(uniform_filter1d(uniform_filter1d(luck, size=3, axis=0), size=9, axis=1))
    bar = np.quantile(field[80:330], 1 - read(EMPTY, hz))[:, None]
    total = power[80:].sum(0)
    steady = minimum_filter1d(1. * (total < 4 * np.roll(total, 2)), size=5)
    kept = z * (1 - 1. * (field > bar) * steady)
    return signal.istft(kept, SR, nperseg=1024, noverlap=768)[1][:, :N]


def masked(x):
    hz, t, z = signal.stft(x, SR, nperseg=256, noverlap=192)
    power = (abs(z) ** 2).mean(0)
    band = abs(uniform_filter1d(uniform_filter1d(power, size=3, axis=0), size=3, axis=1))
    top = -minimum_filter1d(-uniform_filter1d(band, size=21, axis=0), size=41, axis=1, origin=6)
    luck = rng.standard_normal(band.shape)
    patch = uniform_filter1d(uniform_filter1d(luck, size=5, axis=0), size=7, axis=1) > 0
    treble = (hz > MASK_FROM_HZ) & (hz < MASK_TO_HZ) | (hz > 1.5 * MASK_TO_HZ)
    gone = patch * (band < top * level_to_linear(2 * MASK_DB)) * treble[:, None]
    return signal.istft(z * (1 - gone), SR, nperseg=256, noverlap=192)[1][:, :N]


def band_limit(x):
    return signal.sosfilt(signal.butter(12, 16970, fs=SR, output="sos"), x)


def record(dry):
    hz = np.linspace(0, SR / 2, 257)
    ports = np.array([signal.firwin2(255, hz, level_to_linear(side * read(PORTS, hz) / 2), fs=SR) for side in (1, -1)])
    heard = 0.85 * np.tanh(signal.oaconvolve(dry, ports, "same", axes=1) / 1.12)
    leak = signal.sosfilt(signal.butter(2, [18, 90], "bandpass", fs=SR, output="sos"), abs(heard))
    heard = signal.sosfilt(signal.butter(8, 168, "highpass", fs=SR, output="sos"), heard)
    heard = heard + level_to_linear(-29.5) * leak * [[.6], [1]]
    band_edge = signal.firwin(255, 16000, window=("kaiser", 7), fs=SR)
    heard = signal.oaconvolve(heard, band_edge[None], "same")
    return band_limit(masked(dropouts(heard)))


dry = scene()
out = record(dry)
wav_out(out)
```